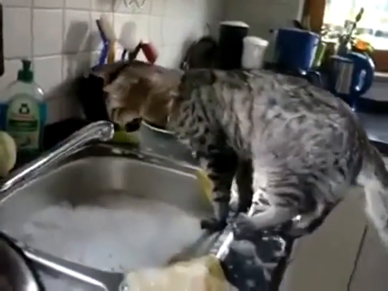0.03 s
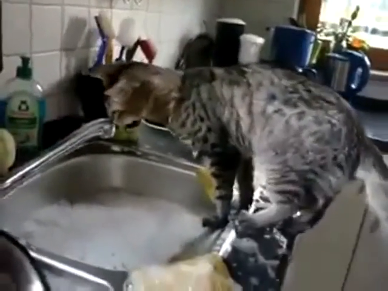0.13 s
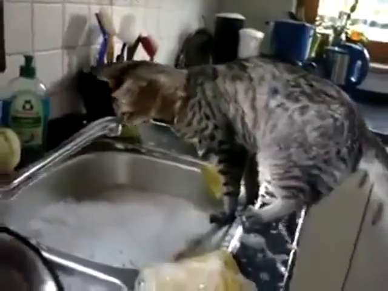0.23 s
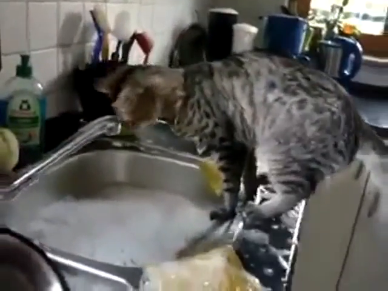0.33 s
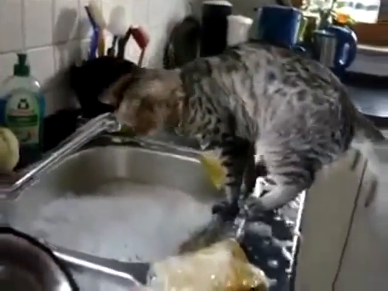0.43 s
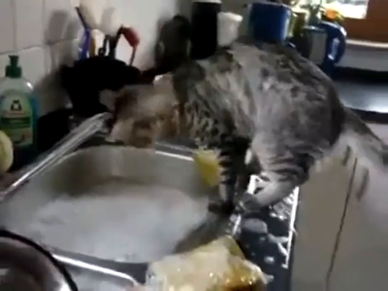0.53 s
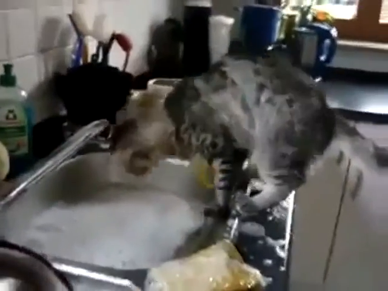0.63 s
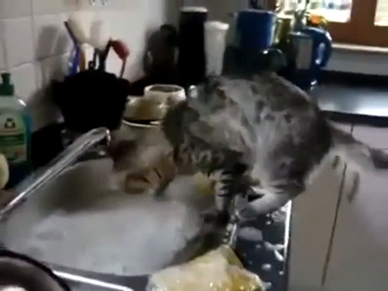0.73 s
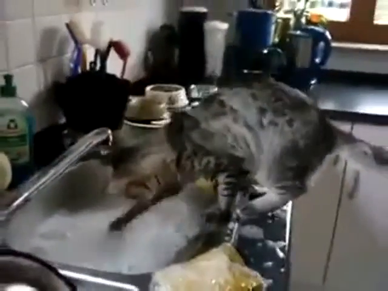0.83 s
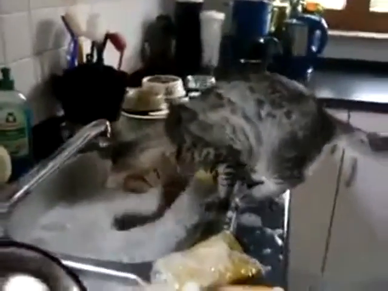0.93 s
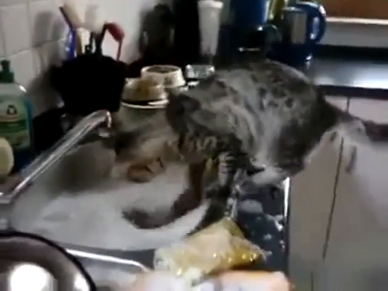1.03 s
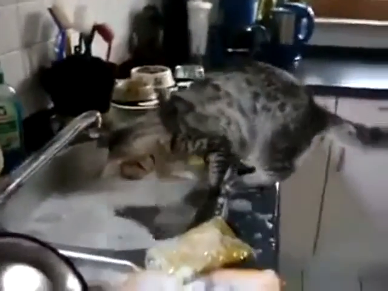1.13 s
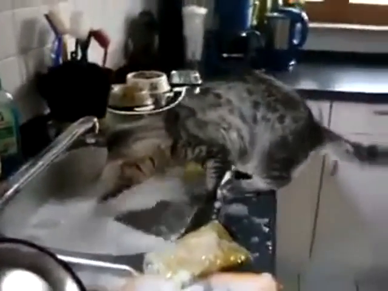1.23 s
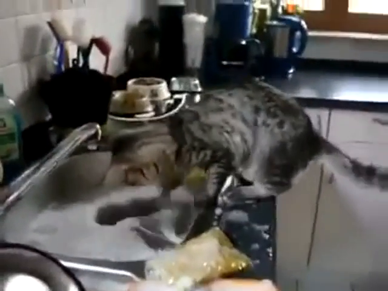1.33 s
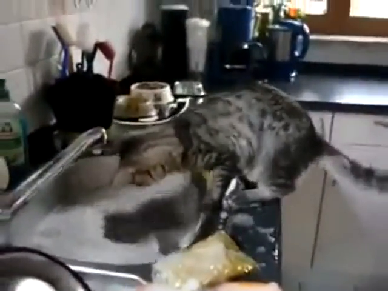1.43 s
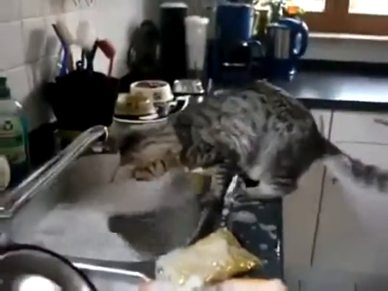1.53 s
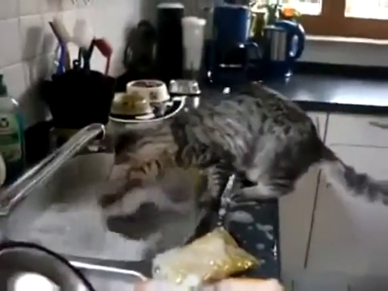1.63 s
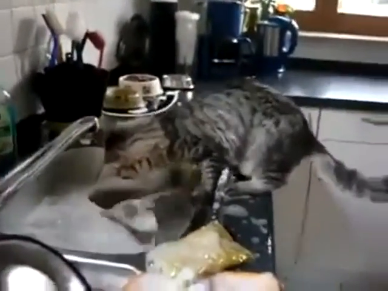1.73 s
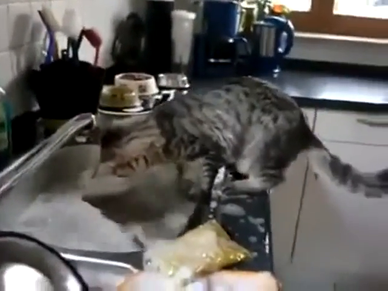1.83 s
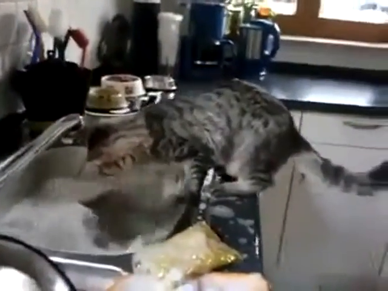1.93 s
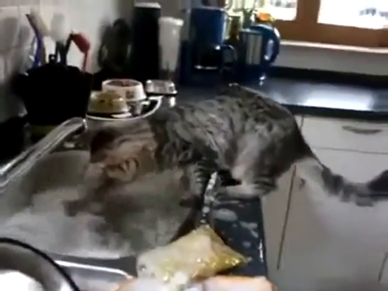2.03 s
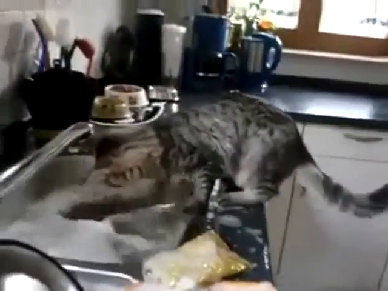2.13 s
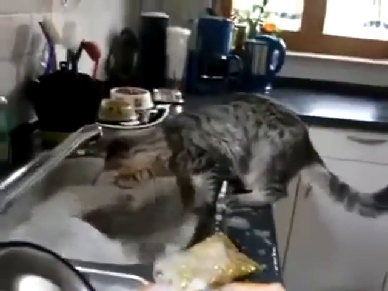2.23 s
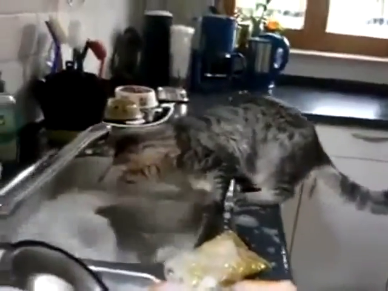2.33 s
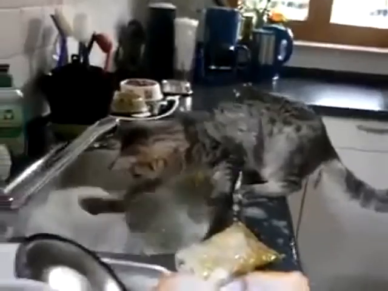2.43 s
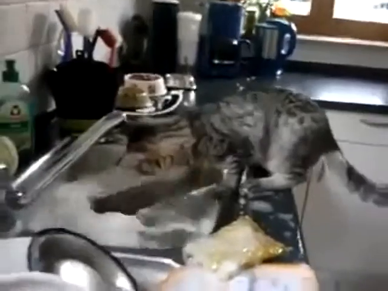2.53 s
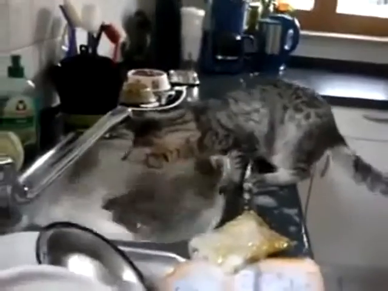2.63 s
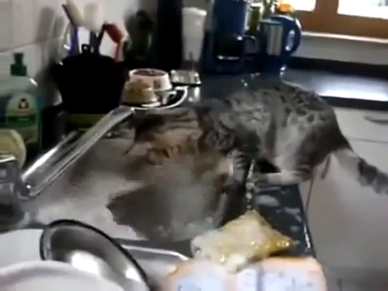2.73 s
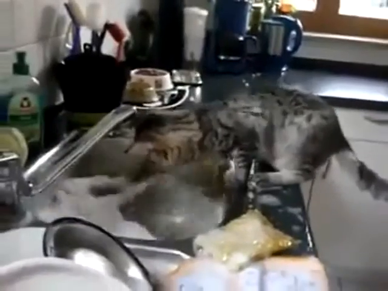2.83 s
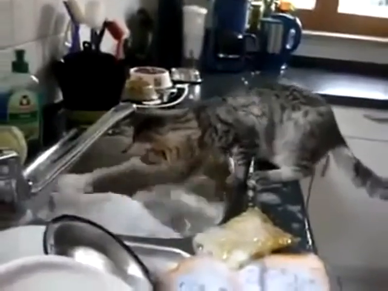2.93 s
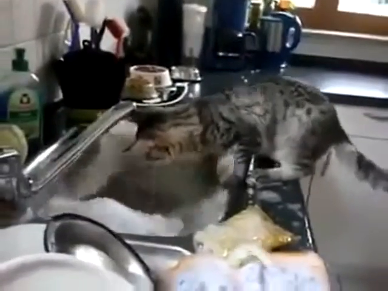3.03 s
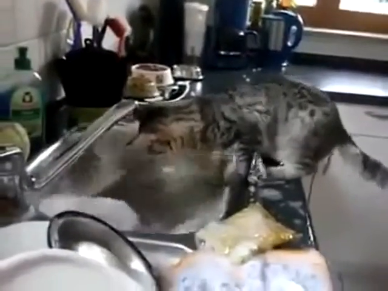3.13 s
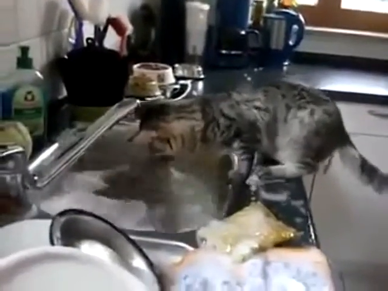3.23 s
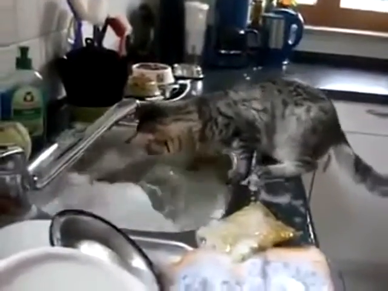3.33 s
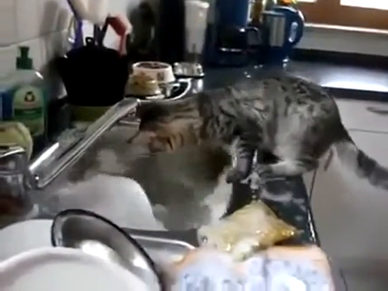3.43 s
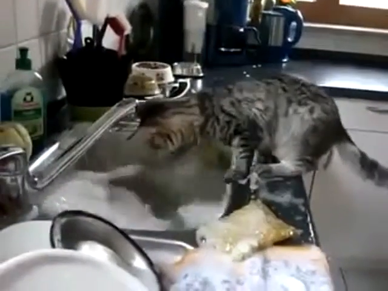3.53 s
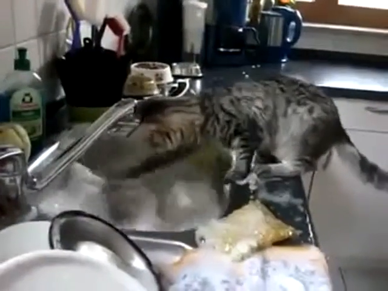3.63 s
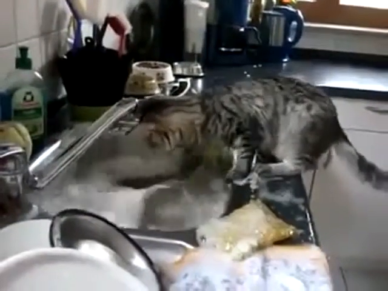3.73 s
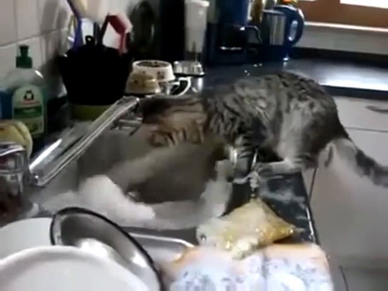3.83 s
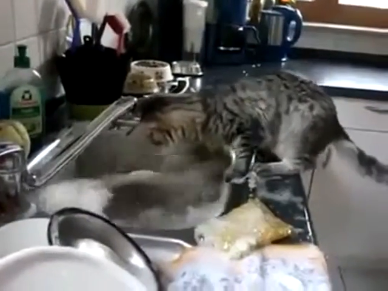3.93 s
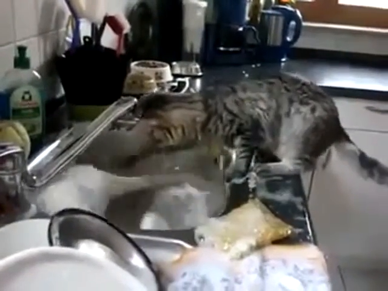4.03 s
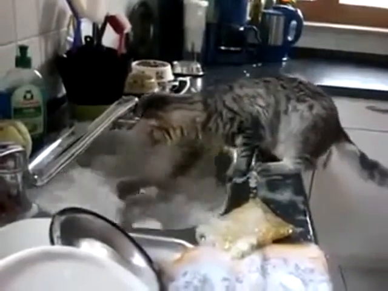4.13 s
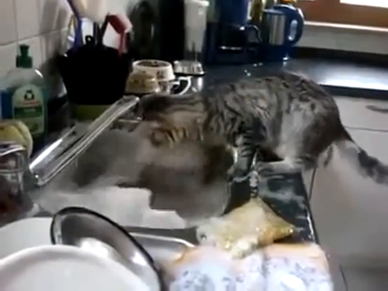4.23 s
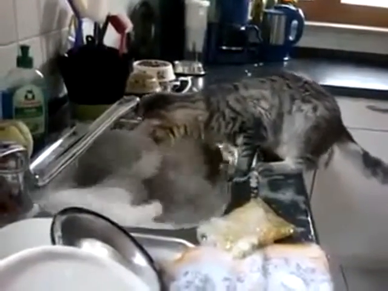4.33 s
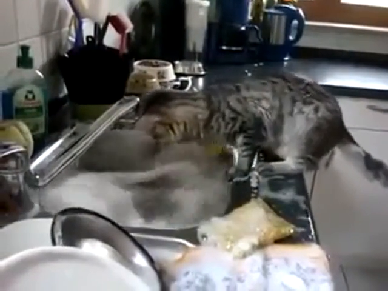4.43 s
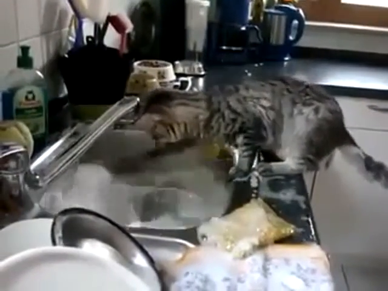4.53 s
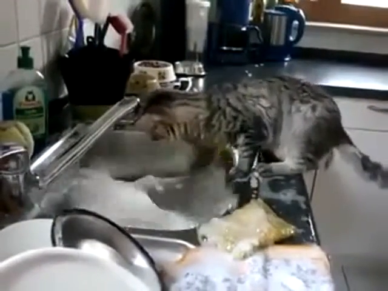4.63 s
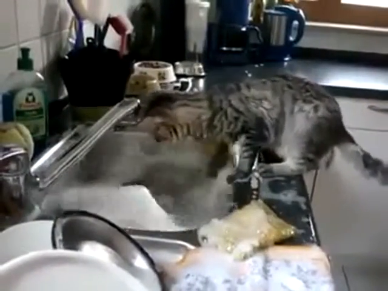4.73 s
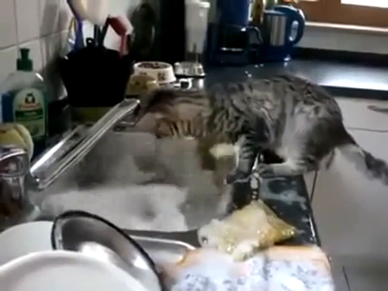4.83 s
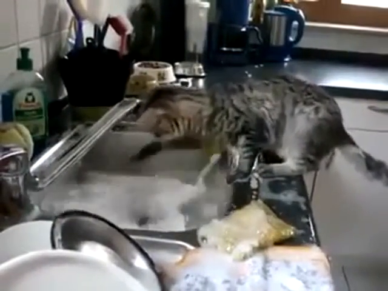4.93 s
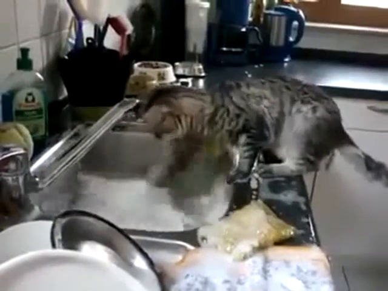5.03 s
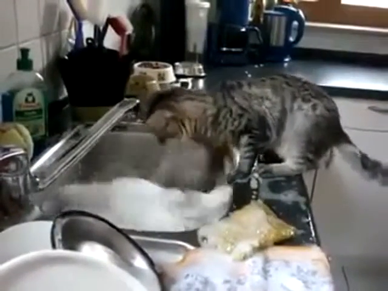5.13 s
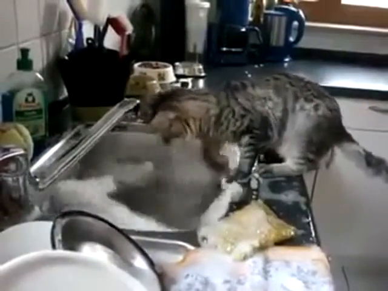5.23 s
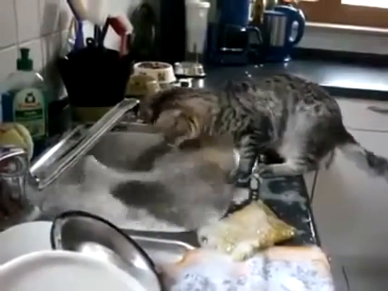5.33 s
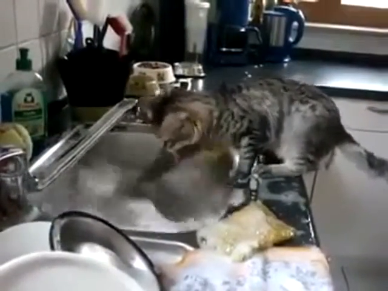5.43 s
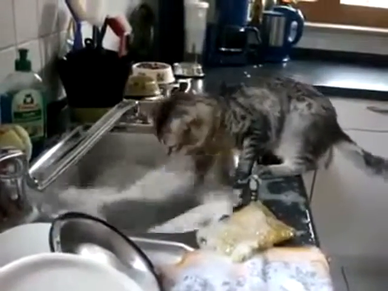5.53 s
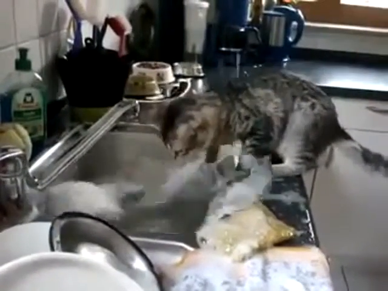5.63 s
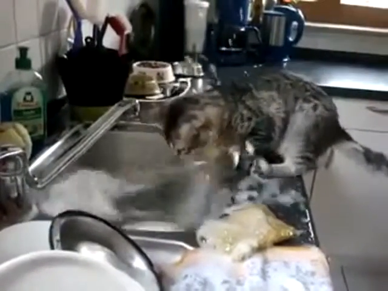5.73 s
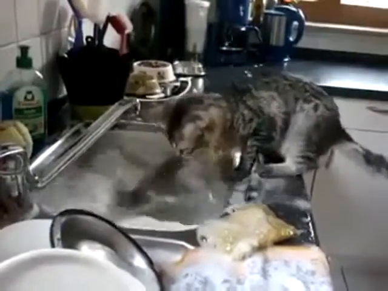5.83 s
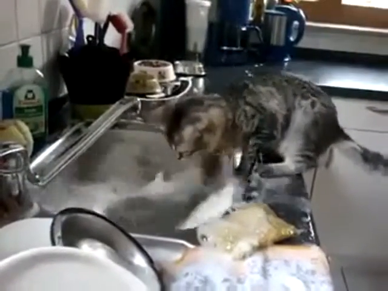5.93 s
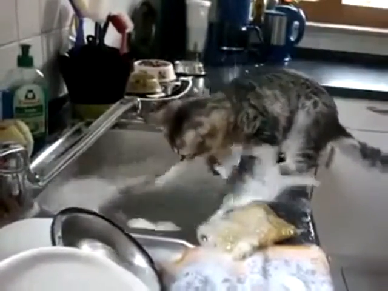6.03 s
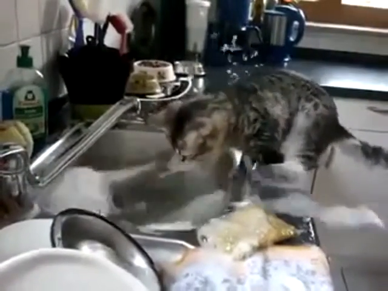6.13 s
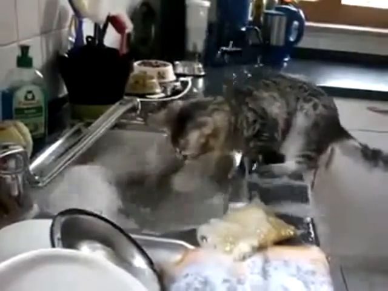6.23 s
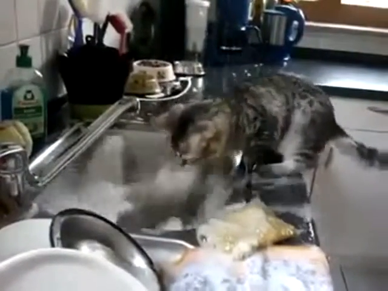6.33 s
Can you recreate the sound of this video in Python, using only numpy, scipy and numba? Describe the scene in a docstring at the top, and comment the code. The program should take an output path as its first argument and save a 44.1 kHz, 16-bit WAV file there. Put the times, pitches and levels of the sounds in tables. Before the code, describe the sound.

A low kitchen hum and microphone hiss come first, with a few faint plops. After about a second a cat starts pawing at soapy water in a steel sink. The water sloshes and fizzes, and quick irregular strokes make plops, small slaps and pattering spray. Later some strokes add low gulps and soft thuds through the counter. The basin sounds slightly hollow and the tiled room rings briefly.

```python
"""A cat paws at soapy water in a steel kitchen sink. At first only low hum, microphone hiss and a few
faint plops are heard. From about 1 s the water starts to slosh and fizz; each stroke traps air pockets
that plop and throws spray, with ticks on the surface and bumps through the counter. From 3.4 s some
strokes also pull low gulps. Throughout, the basin colours the water and the tiled room rings briefly."""
import sys
import numpy as np
from scipy import signal
from scipy.fft import rfft, irfft, next_fast_len
from scipy.io import wavfile
from scipy.ndimage import uniform_filter1d
from numba import njit

SR = 44100
rng = np.random.default_rng(int(sys.argv[2]) if len(sys.argv) > 2 else 0)


def materialize(psi):
    """Save the field psi as 16-bit PCM at rate SR to the path in sys.argv[1].

    A 1-D psi becomes a single channel; in a 2-D psi each row is a channel.
    """
    bounded = np.clip(np.atleast_2d(psi).T, -1, 1)
    quanta = np.round(bounded * 32767).astype(np.int16)
    wavfile.write(sys.argv[1], SR, quanta)


N = 281799


def undb(db):
    return 10 ** (np.asarray(db) / 20)


def unit(x):
    return x / np.sqrt(np.mean(x ** 2))


def add(out, start_s, x):
    i = int(start_s * SR)
    out[i:i + len(x)] += x[:N - i]


def on_log(table, hz):
    """Read (Hz, value) rows on a log-frequency axis."""
    knots_hz, values = np.transpose(table)
    return np.interp(np.log(np.maximum(hz, 1)), np.log(knots_hz), values)


def colour(x, table):
    """Filter by (Hz, dB) rows; rms 1."""
    size = next_fast_len(len(x))
    gain = undb(on_log(table, np.arange(size // 2 + 1) * SR / size))
    return unit(irfft(rfft(x, size) * gain, size)[:len(x)])


def band(x, hz, width_hz):
    """One resonance, gain 1 at its centre."""
    return signal.lfilter(*signal.iirpeak(hz, hz / width_hz, SR), x)


def walk(rate_hz):
    """Random levels, held and slewed; spread near 1."""
    step = int(SR / rate_hz)
    held = np.repeat(rng.standard_normal(N // step + 1), step)
    return uniform_filter1d(held, step // 2 + 1)[:N]


def burst(noise, hz, spread, rise_s, decay_s, hold=0.84):
    """Noise puff, spread = width / centre, -60 dB at decay_s; hold over 1 lingers, then drops fast."""
    t = np.arange(len(noise)) / SR
    hz = np.clip(hz, 40, 9000)
    filtered = band(band(noise, hz, spread * hz), hz, spread * hz)
    rise = 1 - np.exp(-t / max(rise_s, .0003))
    envelope = rise * np.exp(-np.log(1000) * (t / max(decay_s, .005)) ** hold)
    return unit(filtered * envelope) * np.sqrt(np.mean(envelope ** 2))


def puffs(rows, spread):
    """One noise puff per row."""
    out = np.zeros(N)
    for start_s, db, hz, rise_s, decay_s in rows:
        add(out, start_s, undb(db) * burst(rng.standard_normal(SR // 4), hz, spread, rise_s, decay_s))
    return out


@njit
def bubbles(start, hz, cycles, gain, swell_s, glide):
    """Damped sines that swell, then climb by the share glide as each bubble nears the surface."""
    out = np.zeros(N)
    for k in range(len(start)):
        length, lead = cycles[k] * SR / hz[k], swell_s[k] * SR
        phase = 0.
        for i in range(min(int(length + lead), N - start[k])):
            age = max(i - lead, 0.) / length
            phase += 2 * np.pi * hz[k] / SR * (1 + glide * age)
            envelope = min(i / lead, 1.) ** 2 * np.exp(-age - 5 * age ** 2)
            out[start[k] + i] += gain[k] * envelope * np.sin(phase)
    return out


def ring(time_s, db, hz, cycles, swell_s, glide):
    """Bubbles halfway through their swell at time_s."""
    start = ((time_s - swell_s / 2) * SR).astype(np.int64)
    return bubbles(start, hz, np.maximum(cycles, 2), undb(db), np.full(len(start), swell_s), glide)


def hum_and_hiss():
    """Low kitchen hum, wavering around 450 Hz, over steady microphone hiss."""
    # Noise spectrum. Each row: frequency in Hz, relative density in dB.
    spectrum = [(30, -28.5), (100, -20.5), (170, -7.5), (230, -4), (350, -3), (480, -7), (900, -10.5),
                (2500, -14.5), (6500, -21.5), (10000, -28)]
    steady = colour(rng.standard_normal(N), spectrum)
    waver = (undb(1.4 * walk(rate_hz=8.9)) - 1) * band(steady, 450, width_hz=250)
    return undb(-50.5) * (steady + waver)


def room(x):
    """Reverberation of the tiled room; each octave dies at its own rate."""
    # Each row: frequency in Hz, time to fall 60 dB in seconds.
    t60 = [(200, 0.065), (800, 0.32), (2000, 0.11), (6000, 0.077)]
    t = np.arange(SR // 2) / SR
    tail = np.zeros(len(t))
    for hz in 150 * 2 ** np.arange(7):
        decay = np.exp(-np.log(1000) * t / on_log(t60, hz))
        tail += band(rng.standard_normal(len(t)), hz, 0.8 * hz) * decay
    tail *= 1 - np.exp(-t / 0.012)
    return signal.fftconvolve(x, tail / np.sqrt(np.sum(tail ** 2)))[:N]


def basin(x):
    """Resonances of the steel bowl and the air in it."""
    # Each row: centre in Hz, width in Hz, gain in dB.
    modes = [(256.6, 16, 11), (414, 54, 0.5), (615, 29, -2), (799, 15, -7), (1004, 29, -3)]
    return sum(undb(db) * band(x, hz, width_hz) for hz, width_hz, db in modes)


def bumps():
    """Thuds carried through the counter."""
    # Each row: start in seconds, level in dB.
    thuds = [(1.622, -46), (3.853, -36), (4.251, -33.5), (4.453, -41), (5.6, -41), (6.059, -48),
             (6.109, -39)]
    hz, rise_s, decay_s = 60, 0.0011, 0.056
    return puffs([(start_s, db, hz, rise_s, decay_s) for start_s, db in thuds], spread=4.0)


def droplets(rough_db, clump_db):
    """Dense grains of bursting foam and falling drops; each size clumps on its own."""
    out = np.zeros(N)
    for k, hz in enumerate(700 * 1.2 ** np.arange(16)):
        grains = rng.standard_normal(N) * undb(rough_db * walk(400) + clump_db * walk(55))
        out += 0.99 ** k * unit(band(grains, hz, 0.16 * hz))
    return unit(out)


def fizz():
    """Soap foam bursting."""
    # Foam filter. Each row: frequency in Hz, relative gain in dB.
    spectrum = [(500, -33), (1500, -15), (3000, 6.5), (5000, 7), (7000, 2), (10000, -0.5)]
    return colour(droplets(rough_db=2.5, clump_db=4.6), spectrum)


def slosh(count=14000):
    """Random bubbles of all sizes over the deep wobble of the full basin."""
    # Each row: bubble pitch in Hz, relative level in dB.
    pitch_levels = [(150, -30), (300, -12), (600, 5.5), (1100, 12), (2000, 11.5), (4000, -2), (9000, -25)]
    when, pitch, strength, length = rng.random((count, 4)).T
    hz = 200 * 40 ** pitch
    gain = undb(on_log(pitch_levels, hz) + 14 * strength)
    start = (when * N).astype(np.int64)
    crowd = bubbles(start, hz, cycles=4.6 + 22 * length, gain=gain, swell_s=1.79 / hz, glide=0.12)
    wobble = band(rng.standard_normal(N), 50, width_hz=110) * undb(3.0 * walk(14))
    return unit(crowd) + undb(-19.5) * unit(wobble)


def churn():
    """Stirred water fizzes and sloshes, fading in from 0.9 s."""
    # Each row: time in seconds, gain in dB ahead of the fade-in.
    contour = [(1.0, -49), (1.25, -37.5), (1.6, -41), (2.1, -43), (2.5, -47.5), (2.8, -44), (3.1, -42),
               (3.45, -44), (3.8, -42.5), (4.05, -41.5), (4.15, -51), (4.3, -36.5), (4.5, -50), (4.75, -42),
               (5.05, -51.5), (5.6, -42.5), (6.39, -43.5)]
    t = np.arange(N) / SR
    gain = undb(np.interp(t, *np.transpose(contour)))
    fade_in = np.clip((t - .9) / 1.92, 0, 1)
    return gain * fade_in * (undb(-2) * fizz() + slosh())


def gulps(decay_s=0.13):
    """Low gulps as the paw pulls water off the basin floor."""
    # Each row: start in seconds, level in dB, centre in Hz, rise in seconds.
    pulls = [(3.436, -34, 433, .025), (3.815, -23.5, 340, 0.021), (3.85, -23, 443, 0.009),
             (4.098, -36, 259, 0.025), (4.449, -23, 570, 0.0038), (4.461, -38.5, 426, 0.0033),
             (5.602, -28, 450, 0.025), (5.65, -35, 293, 0.027)]
    return puffs([(*row, decay_s) for row in pulls], spread=1.0)


def ticks(rise_s=.0003):
    """A pad or a drop hits the surface flat."""
    # Each row: start in seconds, level in dB, centre in Hz, decay in seconds.
    hits = [(1.62, -24.5, 2300, .035), (1.7742, -30.5, 3400, 0.044), (1.9776, -13.5, 2410, .012),
            (2.3976, -9, 1690, .012), (2.268, -26, 1500, .015), (2.625, -16.5, 3470, 0.015),
            (3.039, -18, 1500, 0.013), (3.089, -20, 1500, 0.012), (3.1675, -17, 2080, 0.0085),
            (3.411, -17, 1500, 0.0082), (3.457, -21, 5400, .015), (3.574, -19, 1900, .009),
            (4.163, -13, 2050, 0.011), (4.201, -19, 1200, .014), (4.393, -30, 1200, .014),
            (4.45, -25, 1100, .011), (4.862, -23.5, 2000, .04), (5.06, -29, 3800, 0.017),
            (5.654, -13, 2520, 0.011), (6.053, -25, 1900, .015)]
    return puffs([(start_s, db, hz, rise_s, decay_s) for start_s, db, hz, decay_s in hits], spread=.55)


def plinks():
    """A bubble and a weaker, later twin of the same pitch ring inside a small splash."""
    # Each row: time in seconds, level in dB, pitch in Hz, ring length in cycles.
    pairs = [(0.5, -52, 1650, 20), (2.067, -27.5, 648, 12), (2.075, -34, 2540, 45),
             (2.626, -25.5, 4280, 22), (2.672, -21, 2430, 22), (2.953, -30.5, 1010, 21),
             (3.005, -33, 1630, 20), (3.126, -31, 3200, 25), (3.323, -22.5, 2390, 30),
             (3.335, -26.5, 2500, 27), (3.384, -38.5, 440, 12), (3.722, -26.5, 1554, 18),
             (3.944, -23.5, 1030, 18), (4.164, -24, 1007, 18), (4.163, -18.5, 2390, 15),
             (4.391, -27, 1060, 15), (4.94, -27.5, 3300, 20), (5.061, -33.5, 1740, 12),
             (5.083, -33, 1850, 18), (5.132, -32, 2250, 18), (5.17, -35, 1600, 14), (5.259, -33, 1360, 14),
             (5.29, -31, 3040, 20), (5.787, -36, 1000, 10), (5.948, -36, 720, 8), (5.979, -30.5, 863, 12)]
    time_s, db, hz, cycles = np.transpose(pairs)
    glide, splash_rise_s, splash_decay_s = 0.068, .003, .18
    splash = puffs([(*row[:3], splash_rise_s, splash_decay_s) for row in pairs], spread=0.48)
    first = ring(time_s, db, hz, cycles, swell_s=0.00276, glide=glide)
    twin = ring(time_s + 0.0053, db - 9, hz, cycles, swell_s=0.0092, glide=glide)
    return undb(-11) * splash + first + twin


def sprays():
    """Water thrown up by a stroke hisses at once and patters back down."""
    # Each row: start in seconds, level in dB, decay in seconds, mist relative to drops in dB,
    # drop pitch shift in octaves, rise in seconds.
    sheets = [(1.215, -47, 0.41, -9, -0.11, .005), (1.354, -40, 0.084, -9, 0.066, .003),
              (1.473, -40, .11, -11, 0.065, .003), (1.603, -36, .28, -11, 0, .005),
              (1.776, -43, 0.25, -16, 0.24, .003), (1.866, -33, .07, -10, -0.45, .003),
              (1.878, -35, 0.1, 3, 0.34, .008), (1.978, -25.5, 0.085, -8, -0.062, 0.0027),
              (2.006, -38, 0.18, -18, -0.04, 0.0046), (2.048, -36, 0.14, -20, -0.13, 0.0037),
              (2.139, -38, .091, -14.5, -0.044, .003), (2.199, -38, .3, -4, -0.019, 0.0042),
              (2.263, -35, 0.17, -15, 0.031, .004), (2.373, -45, 0.075, 8, .5, .003),
              (2.392, -31.5, 0.29, -8.5, -0.015, 0.0042), (2.624, -33.5, 0.21, -15, .1, .006),
              (2.735, -43.5, 0.046, 10, 0, .003), (2.756, -34, 0.067, -1.5, 0.12, .003),
              (2.774, -26.5, .14, -12, -0.091, .004), (2.84, -42.5, .19, 7.5, 0, .004),
              (3.002, -47.5, .15, 4.5, 0, .004), (3.049, -33, .22, -21, 0, .005),
              (3.127, -40, .038, -1, .3, .003), (3.166, -29, .24, -17, -0.094, .003),
              (3.261, -37.5, 0.21, 2, 0.46, 0.0055), (3.35, -36, 0.39, -9, -0.12, .005),
              (3.411, -34.5, .11, -10, -.2, .003), (3.455, -32, 0.17, 1.5, 0.27, 0.0018),
              (3.511, -35.5, 0.38, -17, .2, .007), (3.569, -30, .07, -21, -0.067, .007),
              (3.655, -51.5, .3, 11.5, 0.058, .005), (3.787, -34.5, 0.26, -3.5, 0.035, .005),
              (3.87, -30, 0.15, -6, -0.041, 0.0044), (3.964, -29.5, 0.071, -27, 0.045, .003),
              (3.99, -24.5, 0.16, -8.5, 0.51, .007), (4.028, -36.5, 0.38, -1.5, 0.11, .005),
              (4.159, -33.5, 0.1, 1.5, -0.17, .002), (4.213, -32, 0.065, -8, -.3, .003),
              (4.235, -32, 0.12, -1, -0.12, .006), (4.303, -27, 0.15, -8, 0.38, 0.0052),
              (4.335, -38.5, 0.094, -8, 0.12, .004), (4.446, -37.5, .25, 2.5, 0.05, .003),
              (4.553, -44, .3, 2, -0.06, .005), (4.649, -44, .038, 3, 0, .003),
              (4.671, -35, 0.33, -6.5, 0, 0.0045), (4.75, -36.5, .088, -23, 0.077, .003),
              (4.803, -40.5, .075, -1, .2, .003), (4.819, -35, 0.45, -3, -0.19, .006),
              (4.939, -49, .046, 7, 0, .003), (5.062, -41.5, 0.52, -6, -0.034, 0.0065),
              (5.212, -29.5, 0.057, -17, 0.11, .003), (5.29, -38, 0.062, -15, 0, .003),
              (5.304, -38, 0.23, 2.5, 0.2, .004), (5.403, -39, 0.041, -5, .5, .003),
              (5.654, -25, .1, -11, -0.085, .002), (5.72, -35.5, 0.29, 0.5, 0.06, 0.0045),
              (5.774, -41, .12, 2, 0, .006), (6.042, -32.5, 0.17, 0, -0.26, .004),
              (6.101, -36, 0.3, 2.5, 0.034, .004), (6.23, -37, 0.072, -15, -.2, .002),
              (6.31, -35.5, 0.27, -3.5, 0.018, 0.0054)]
    coarse_hz, coarse_spread, mist_hz, mist_spread = 2590, 1.82, 6140, 1.43
    out = np.zeros(N)
    drops = droplets(rough_db=4, clump_db=3.5)
    for start_s, db, decay_s, mist_db, octaves, rise_s in sheets:
        grains = drops[int(start_s * SR):][:SR // 3]
        coarse = burst(grains, coarse_hz * 2 ** octaves, coarse_spread, rise_s, decay_s, hold=1.7)
        mist = burst(grains, mist_hz, mist_spread, rise_s, 0.59 * decay_s, hold=1.7)
        add(out, start_s, undb(db) * (coarse + undb(mist_db) * mist))
    return out


def plops(pinch_off_s=0.00709, trail_count=9):
    """Each trapped air pocket swells, rings a few cycles and breaks into froth and a bubble trail."""
    # Each row: time in seconds, level in dB, pitch in Hz, froth relative to the ring in dB.
    pockets = [(0.054, -47, 1035, 6), (0.082, -46, 990, 6), (1.104, -49.5, 1190, 9),
               (1.232, -42, 1130, 10.5), (1.254, -36.5, 610, 2.5), (1.328, -37, 2045, 3),
               (1.497, -35, 1210, 6), (1.616, -15.5, 1220, 0.5), (1.774, -35.5, 855, 6.5),
               (1.866, -38, 750, 7.5), (1.978, -23, 1340, 0.5), (2.172, -32.5, 950, 3.5),
               (2.217, -19.5, 955, -1.5), (2.227, -26.5, 1106, -4), (2.267, -25, 1136, -3),
               (2.398, -12, 1063, 1), (2.56, -37.5, 970, 0), (2.625, -18.5, 2970, -12),
               (2.645, -28, 1020, 3.5), (2.778, -15.5, 976, 0), (2.862, -34.5, 986, 5.5),
               (3.038, -27.5, 980, 5.5), (3.059, -30, 796, 5.5), (3.167, -18, 1050, -5),
               (3.192, -23, 1153, -8), (3.221, -24.5, 1110, -11), (3.352, -29.5, 1115, -1),
               (3.411, -23, 1033, 1), (3.424, -21, 892, -1.5), (3.459, -32, 664, 3), (3.494, -27, 1080, 0),
               (3.524, -32, 1000, 4.5), (3.57, -25.5, 935, 4.5), (3.583, -18, 1990, -0.5),
               (3.793, -32, 2590, -6), (3.829, -27.5, 966, 0), (3.84, -28, 1080, -15),
               (3.848, -11, 960, -10), (3.856, -17.5, 1007, -3), (3.866, -33, 1790, 0),
               (3.888, -26, 1120, -3), (3.968, -25.5, 932, -3), (4.16, -26, 1100, -10),
               (4.201, -28, 1120, -1), (4.213, -23, 1130, 2.5), (4.22, -24, 945, 1.5),
               (4.237, -24, 1595, -4), (4.304, -27, 1360, -5), (4.45, -24.5, 950, -1), (4.495, -42, 940, 2),
               (4.537, -34, 1680, -3), (4.564, -31, 1000, -1), (4.674, -30, 1570, -6),
               (4.861, -14.5, 977, 1), (4.879, -23.5, 772, -6), (5.061, -26.5, 995, -9),
               (5.085, -36.5, 990, 6), (5.124, -29, 2040, 2.5), (5.203, -36.5, 860, 9),
               (5.212, -20, 1176, 0.5), (5.312, -26, 1403, 2), (5.541, -37.5, 465, 3), (5.578, -34, 670, 8),
               (5.596, -29.5, 910, 7), (5.603, -23, 977, -6), (5.619, -28.5, 1000, 5),
               (5.63, -28, 1850, -5), (5.655, -23, 975, -3), (5.725, -38.5, 590, 10),
               (5.795, -36.5, 605, 0), (5.85, -40, 1120, 3), (5.883, -40, 1040, 9.5),
               (5.911, -33.5, 1145, 1.5), (5.935, -39.5, 780, 4), (5.995, -38, 487, 1.5),
               (6.049, -25, 857, 3.5), (6.068, -26.5, 652, -1.5), (6.068, -26, 1755, 0),
               (6.104, -29, 830, 4), (6.139, -29.5, 1030, 0), (6.321, -27, 1020, 2), (6.382, -22, 977, -5)]
    time_s, db, hz, froth_db = np.transpose(pockets)
    force_db = db + 33  # harder strokes shorten both ring and froth
    decay_s = 0.12 - 0.0034 * force_db
    out = ring(time_s, db, hz, cycles=5.3 - 0.13 * force_db, swell_s=pinch_off_s, glide=0.078)
    late, pitch, length = rng.random((len(pockets), trail_count, 3)).T
    trail_s = time_s + 0.003997 + .5 * late * decay_s
    trail_db = db + froth_db - 9 - 30 * late
    trail_hz = hz * 2 ** (pitch - .4)
    out += ring(trail_s.ravel(), trail_db.ravel(), trail_hz.ravel(),
                cycles=4 + 9 * length.ravel(), swell_s=.002, glide=.15)
    for k in range(len(pockets)):
        noise = rng.standard_normal(SR // 4)
        froth = burst(noise, hz[k], spread=0.83, rise_s=pinch_off_s, decay_s=decay_s[k])
        add(out, time_s[k] - pinch_off_s / 2, undb(db[k] + froth_db[k]) * froth)
    return out


def scene():
    """Water in basin and room, plus bumps, hum and hiss; mono."""
    water = churn() + ticks() + plops() + plinks() + sprays() + gulps()
    sink = water + basin(water)
    return (sink + undb(-19.5) * room(sink) + bumps() + hum_and_hiss())[None]


def record(dry):
    """Steep elliptic low-pass."""
    cutoff_hz = 10150
    return signal.sosfilt(signal.ellip(10, .2, 90, cutoff_hz, fs=SR, output="sos"), dry)


dry = scene()
out = record(dry)
materialize(out)
```